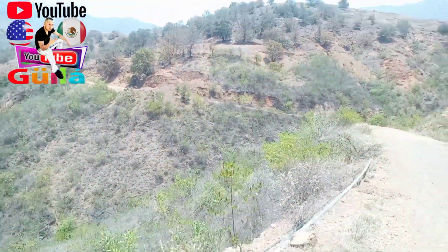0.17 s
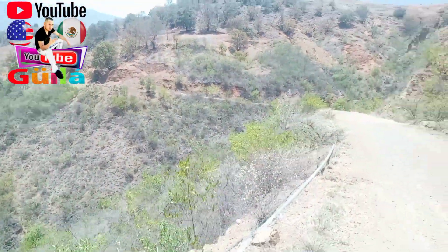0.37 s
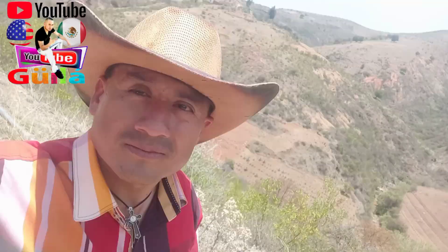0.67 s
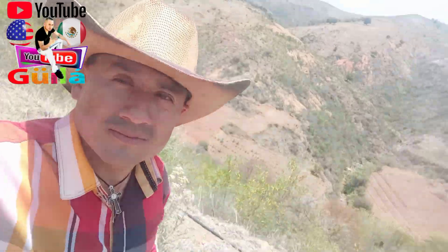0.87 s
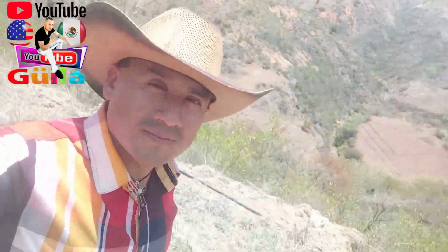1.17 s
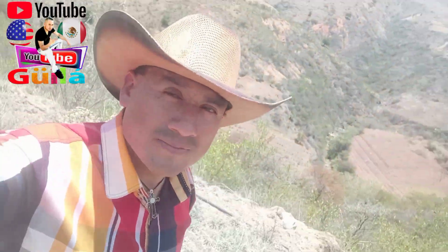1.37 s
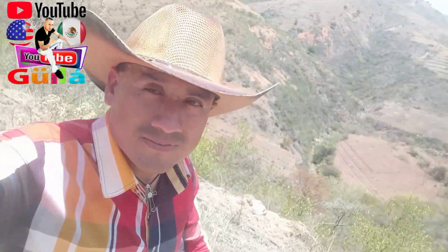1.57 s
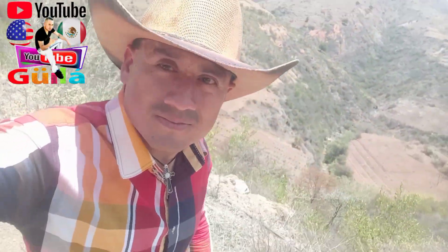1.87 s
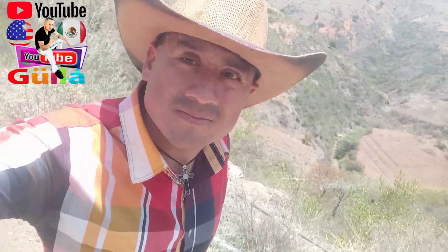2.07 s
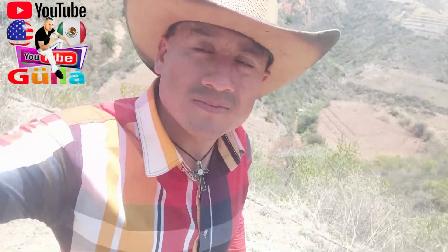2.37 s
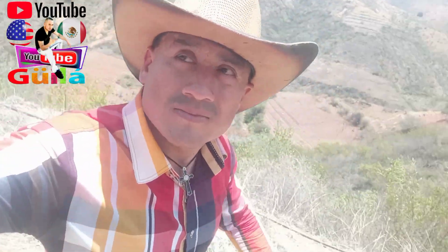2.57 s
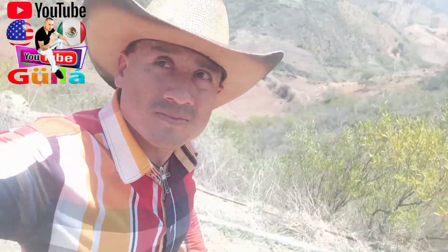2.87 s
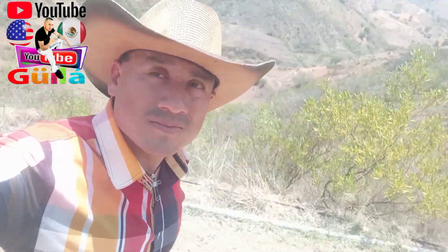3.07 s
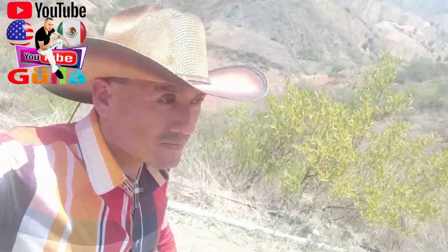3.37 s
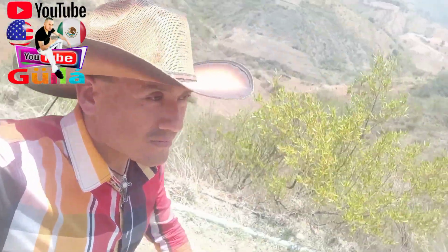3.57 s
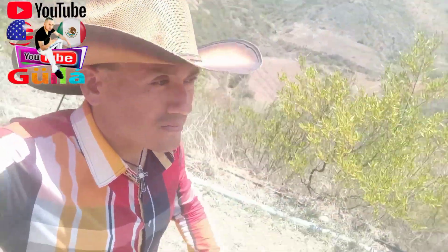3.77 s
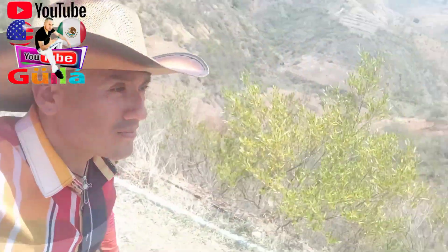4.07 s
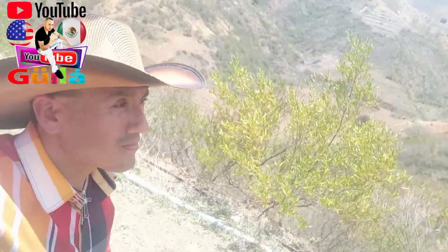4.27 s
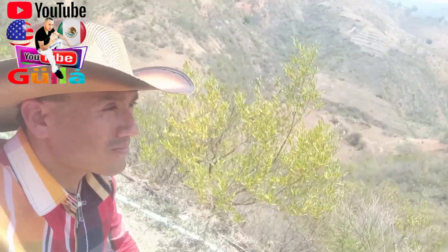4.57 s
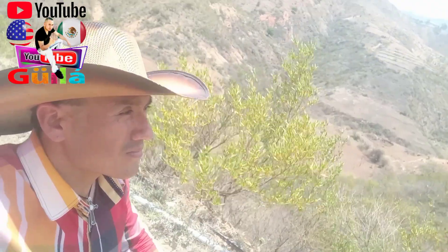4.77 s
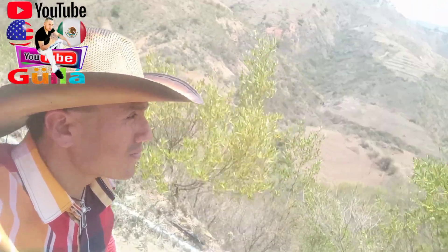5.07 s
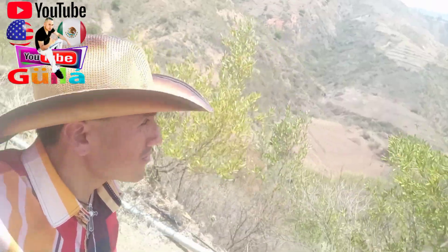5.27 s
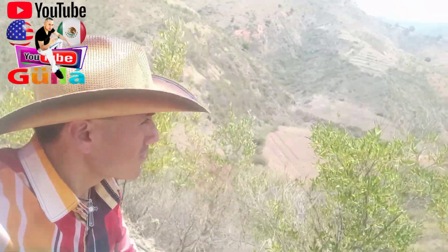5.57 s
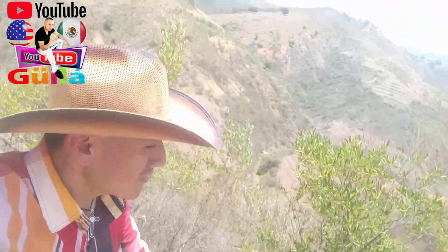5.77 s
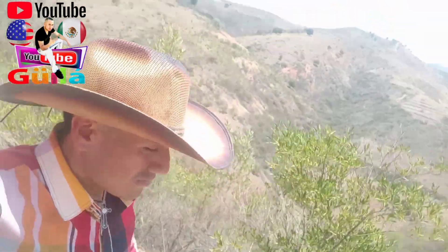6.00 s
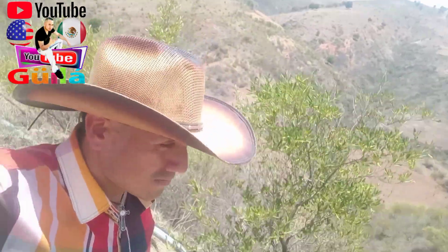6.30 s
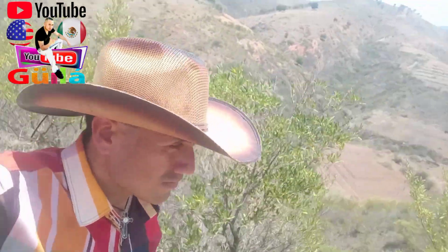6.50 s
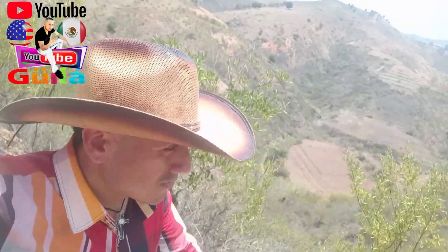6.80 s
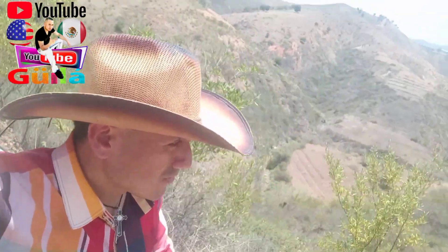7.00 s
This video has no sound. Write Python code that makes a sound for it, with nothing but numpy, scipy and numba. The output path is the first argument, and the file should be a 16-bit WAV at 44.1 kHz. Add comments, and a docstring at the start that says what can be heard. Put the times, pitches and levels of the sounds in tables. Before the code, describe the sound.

Boots crunch over gravel on an open hillside, a sharp knock and brief silence, then wind buffets the handheld microphone ever harder.

```python
"""Gravel crunches and clacks under a walker's feet, a finger knocks the case, and the sound drops out and fades in.
Then wind buffets a small two-port microphone on an open hillside: banded noise throbs and sharp eddies thump.
Stones are dense grains ringing at their own pitch, clacks and grip pops are short swings that fall in pitch,
the knock is bright snaps over a few sagging, decaying tones, and a faint insect on the left is a comb of close lines."""
import sys
import numpy as np
from scipy import signal
from scipy.fft import rfft, irfft, next_fast_len
from scipy.io import wavfile
from scipy.ndimage import uniform_filter1d, minimum_filter1d
from numba import njit

SR = 44100
rng = np.random.default_rng(int(sys.argv[2]) if len(sys.argv) > 2 else 0)


def to_linear_factor(level_db):
    """Convert decibel levels (scalar or array-like) to linear amplitude factors."""
    exponent = np.asarray(level_db, float) / 20
    return 10 ** exponent


def digitize_waveform(pressure):
    """Quantize a signal to 16-bit integers and store it at the path in sys.argv[1].

    Rows of a 2-D input are taken as channels; values are limited to [-1, 1].
    """
    field = np.atleast_2d(pressure).T
    bounded = np.clip(field, -1, 1)
    quanta = np.round(bounded * 32767).astype(np.int16)
    wavfile.write(sys.argv[1], SR, quanta)


N = 314874
T = np.arange(N) / SR  # s
SIZE = next_fast_len(N + 4096)
HZ = np.arange(SIZE // 2 + 1) * SR / SIZE + 1e-3  # kept just above zero
CUT_S, BACK_S, FULL_S = 0.648, 0.677, 0.94  # dropout: cut, fade-in start, full again


def unit(x):
    """Scale to rms 1."""
    return x / np.sqrt(np.mean(x ** 2))


def on_log(hz, table, column=1):
    """Read a spectrum table along a log-frequency axis."""
    table = np.array(table, float)
    return np.interp(np.log(hz), np.log(table[:, 0]), table[:, column])


def shape(x, gain):
    """Filter by a gain for every frequency."""
    return irfft(rfft(x, SIZE) * gain, SIZE)[..., :N]


def walk(rate):
    """Random levels held 1 / rate s and slewed twice; spread 1."""
    hold = int(SR / rate)
    steps = np.repeat(rng.standard_normal(N // hold + 1), hold)
    return unit(uniform_filter1d(uniform_filter1d(steps, hold), hold)[:N])


def ports(pan_db):
    """Left and right gains of a sound whose two halves are unrelated."""
    left = 2 / np.sqrt(1 + to_linear_factor(-2 * pan_db))
    return np.array([left, left * to_linear_factor(-pan_db)])


def thumps(table, rise, fall, glide):
    """Each thump rises within part of a cycle and swings out while its pitch falls."""
    out = np.zeros(N + 1500)
    t = np.arange(-500, 1000) / SR
    for s, db, hz in table:
        cycles = hz * t
        swing = np.cos(2 * np.pi * (cycles - glide * cycles * np.tanh(cycles / 2)))
        swell = np.exp(-(cycles / np.where(t < 0, rise, fall)) ** 2)
        i = int(s * SR) - 500
        out[i:i + len(t)] += to_linear_factor(db) * swing * swell
    return out[:N]


def puffs(table, width_s=0.0051):
    """The air stays rough for a moment around each listed event: bumps of height 1."""
    bumps = [np.exp(-((T[::64] - s) / width_s) ** 2) for s, db, hz in table]
    return np.max(bumps, axis=0).repeat(64)[:N]


# turbulence as the ports hear it: (frequency [Hz], relative level per Hz [dB])
WIND_COLOUR = [(25, -40.5), (35, -25.5), (50, -13), (80, 0.5), (140, 1.5), (220, -3.5), (400, -17.5),
               (700, -35), (1100, -53.5), (1600, -66.5), (2000, -80.5), (2500, -102), (3500, -106)]


def buffet(level_db, bright, stirred_db, rumble_db, throb_db=2.0, flap_db=3.0, knee_hz=148.5,
           rate=300.0, spread_db=1.96, smooth=1.215):
    """Uneven small eddies over smoother flow, in half-octave bands that throb together, upper ones deepest."""
    size = to_linear_factor(spread_db * np.minimum(rng.exponential(size=SIZE), 4))
    knocks = unit((rng.random(SIZE) < rate / SR) * rng.standard_normal(SIZE) * size)
    air = rfft((knocks + smooth * rng.standard_normal(SIZE)) / np.hypot(1, smooth))
    throb = throb_db * walk(15.0) + flap_db * walk(60.0)
    stirred_db = uniform_filter1d(stirred_db - np.mean(stirred_db), size=128)
    colour = to_linear_factor(on_log(HZ, WIND_COLOUR))
    # unit power between 70 and 200 Hz
    core = colour[(HZ > 70) & (HZ < 200)]
    colour = colour / np.sqrt(np.mean(core ** 2) * 130 * 2 / SR)
    out = 0
    for hz in 25 * 2 ** np.arange(0, 7.6, 0.5):
        share = np.cos(np.pi / 2 * np.clip(2 * np.log2(HZ / hz), -1, 1)) ** 2
        octaves = np.log2(hz / knee_hz)
        depth = np.clip(0.17 + 0.57 * octaves, 0, 2.1)
        tilt = np.clip(octaves, 0, 2.9) + 0.25 * np.clip(octaves, -2, 0)
        db = level_db + rumble_db * max(-octaves - 0.5, 0) + bright * tilt
        db = db + depth * (throb + stirred_db) + walk(14.0)
        loss_db = np.log(10) / 20 * depth ** 2 * np.var(throb)  # keeps the mean power as the throb deepens
        out = out + to_linear_factor(db - loss_db) * irfft(air * colour * share, SIZE)[:N]
    return out


# wind strength at the left port, which faces the gusts: (time [s], level [dB])
WIND_LEFT = [(0, -45), (.5, -52.5), (.7, -25.5), (.9, -23), (1, -26.5), (1.08, -26.5), (1.2, -29.5),
             (1.33, -26.5), (1.45, -24.5), (1.64, -35), (1.87, -21), (2.13, -33.5), (2.4, -32.5),
             (2.65, -28), (2.83, -31.5), (3.03, -31), (3.17, -22.5), (3.26, -20.5), (3.35, -16.5),
             (3.5, -22.5), (3.68, -21), (3.85, -26), (4.03, -22.5), (4.24, -27), (4.48, -21.5), (4.65, -24),
             (4.78, -19), (5.05, -22.5), (5.22, -22), (5.5, -21.5), (5.83, -25.5), (6.12, -21.5),
             (6.25, -22.5), (6.31, -16), (6.39, -14.5), (6.52, -16.5), (6.59, -17.5), (6.7, -20.5),
             (6.78, -17), (6.88, -18), (6.94, -17.5), (7.14, -18)]
# wind strength at the sheltered right port: (time [s], level [dB])
WIND_RIGHT = [(0, -43), (.3, -51.5), (.47, -36.5), (.65, -45.5), (1.3, -45), (2.2, -37), (2.45, -41.5),
              (2.65, -36.5), (2.85, -39), (3.25, -29.5), (3.85, -32), (4.3, -34.5), (4.7, -34.5),
              (5.25, -37.5), (5.75, -36), (6.15, -51), (6.4, -43), (6.55, -56), (6.85, -39), (7.14, -46)]
# stronger wind is brighter; left row, right row: (level of neutral colour [dB],
# tilt gained per dB of wind [dB per octave], extra rumble [dB per octave])
BRIGHTENING = [(-25, 0.93, 1), (-35.5, 2.5, 3.5)]
BRIGHTEST_DB = 10.5  # per octave


def wind(port, stirred_db):
    """Buffeting at one port, its brightness set by its strength."""
    level_db = np.interp(T, *np.transpose([WIND_LEFT, WIND_RIGHT][port]))
    neutral_db, slope, rumble_db = BRIGHTENING[port]
    bright = np.minimum(slope * (level_db - neutral_db), BRIGHTEST_DB)
    return buffet(level_db, bright, stirred_db, rumble_db)


# single strong eddies hitting the left port: (time [s], peak level [dB], pitch [Hz])
EDDIES = [(0.8133, -16, 272), (0.898, -14, 250), (0.9233, -14, 250), (1.0093, -13, 242), (1.086, -14, 210),
          (1.3973, -11.5, 271), (1.4363, -18, 279), (1.489, -9.5, 203), (1.78, -19.5, 340),
          (1.82, -11.5, 205), (1.8921, -7.5, 218), (1.9363, -15.5, 253), (2.2228, -18.5, 178),
          (2.9083, -12, 203), (3.1771, -8, 260), (3.2503, -12, 280), (3.3081, -3.5, 326), (3.33, -11, 330),
          (3.3417, -2.5, 387), (3.3825, -4, 280), (3.6362, -8.5, 278), (3.748, -9, 316),
          (4.0069, -9.5, 274), (4.039, -15, 263), (4.4656, -5, 170), (4.566, -13.5, 302),
          (4.6984, -8.5, 253), (4.7333, -24, 228), (4.7795, -7.5, 300), (4.855, -14, 301),
          (5.0483, -7, 328), (5.1214, -25, 235), (5.2328, -12, 269), (5.4627, -9, 237), (5.539, -10.5, 252),
          (5.6132, -11.5, 229), (6.1143, -3.5, 239), (6.1876, -19.5, 238), (6.289, 0.5, 230),
          (6.353, -9, 290), (6.388, -5, 380), (6.4035, -4.5, 350), (6.453, -7.5, 363), (6.4926, -6.5, 372),
          (6.5144, -5, 280), (6.557, 0, 237), (6.6148, -8.5, 320), (6.6273, -20.5, 380),
          (6.662, -10.5, 329), (6.698, -7, 355), (6.7327, 1, 356), (6.84, -5, 332), (6.8678, -3, 430),
          (6.8844, -5, 343), (6.9207, -5, 249), (6.9624, -5, 350), (7.0, -6, 394), (7.041, -7.5, 350),
          (7.0735, -6, 390), (7.0813, -8.5, 420), (7.1172, -3.5, 342)]


def eddies():
    """A strong eddy pushes the left port once and swings out at a falling pitch."""
    return thumps(EDDIES, rise=0.38, fall=0.91, glide=0.45)


# feet on the gravel: (time [s], relative landing level [dB], relative rolling level [dB], rolling length [s])
STEPS = [(.005, -61.5, -56, 0.055), (0.073, -69, -57, 0.057), (0.196, -73.5, -62, 0.075),
         (0.313, -88, -73.5, 0.061), (0.379, -76.5, -74, 0.089), (0.482, -66.5, -57.5, 0.029),
         (0.517, -56, -53, 0.19), (1.111, -59.5, -61.5, .14), (1.652, -49.5, -61.5, 0.1),
         (2.179, -49.5, -59, 0.14), (2.45, -70.5, -81.5, 0.03), (2.522, -79, -82, 0.034),
         (2.705, -48.5, -60.5, 0.16), (3.09, -71, -64.5, 0.045), (3.202, -46.5, -60.5, 0.11),
         (3.732, -52.5, -57, 0.1), (4.232, -50, -59, .1), (4.729, -72.5, -68, 0.03),
         (4.776, -63, -66.5, .06), (5.156, -49.5, -78, .04), (5.233, -71, -65, 0.083),
         (5.329, -61.5, -66, 0.035), (5.793, -46.5, -60.5, 0.055), (5.88, -55, -73, 0.021),
         (6.291, -50, -63.5, 0.1), (6.813, -61, -77.5, 0.022), (6.835, -65.5, -68.5, 0.031)]
LAND_RISE_S, LAND_FALL_S = 0.004, 0.006  # time constants of the landing
SOLE_AFTER_S, SOLE_DB = 0.017, -19  # the sole slaps down just after the heel, relative to it
ROLL_FADE_DB_PER_S = 61.5  # the crunch thins as the foot rolls
LIFT_S = 0.026  # time constant with which it dies as the foot lifts


def tread():
    """Weight on the stones: the heel lands, the sole follows, then a fading roll until the foot lifts."""
    out = np.zeros(N)
    for s, land_db, roll_db, length in STEPS:
        t = T - s
        after = np.maximum(t, 0)
        rise = np.exp(np.minimum(t, 0) / LAND_RISE_S)
        sole = to_linear_factor(SOLE_DB) * np.exp(-np.abs(t - SOLE_AFTER_S) / LAND_RISE_S)
        land = to_linear_factor(land_db) * (np.exp(-after / LAND_FALL_S) + sole)
        lift = np.exp(-np.maximum(t - length, 0) / LIFT_S)
        roll = to_linear_factor(roll_db - ROLL_FADE_DB_PER_S * after) * lift
        out += rise * (land + roll)
    return out


@njit
def grains(start, hz, size, turn, cycles, count):
    """Each stone swells and rings a few cycles at its pitch; small ones are lifted so all pitches weigh alike."""
    out = np.zeros(count + 4000)
    for k in range(len(start)):
        if size[k] > 1e-6:
            pole = np.exp((2j * np.pi - 1 / cycles) * hz[k] / SR)
            z = size[k] * hz[k] / 3000 * np.exp(2j * np.pi * turn[k])
            for i in range(min(int(8 * cycles * SR / hz[k]), 3900)):
                out[start[k] + i] += z.imag * i * hz[k] / SR / cycles
                z *= pole
    return out[:count]


# short bright snaps: the crack and rattle of the knock on the case (0.4556 to 0.4865 s), a wind click
# at the left port (6.731 s), otherwise single stones:
# (time [s], relative level [dB], relative treble level [dB], left minus right before colouring [dB])
SNAPS = [(0.4556, -28, -11, 8), (0.459, -32.5, 1.5, -10), (0.4745, -32, -9, -18), (0.4865, -41, -6, -9),
         (1.6603, -31, -3, -12), (2.1322, -44.5, -15, 7.5), (3.2024, -44, -15.5, 14.5),
         (4.0896, -54, -8.5, -6), (4.974, -50, -10.5, -7.5), (5.159, -46, -13, 9), (6.538, -66, 5.5, 6.5),
         (6.731, -42.5, -28, 46)]
# gravel through the hand and case at each port: (frequency [Hz], relative left gain [dB], relative right gain [dB])
GRAVEL_COLOUR = [(150, -13, -7), (350, 1.5, 12), (870, 4.5, 7), (1230, 4.5, -2), (2100, 1.5, -6.5),
                 (2530, -5, -12), (3700, -21.5, -20.5), (4500, -13, -28), (5600, -10, -29),
                 (6440, -19, -29.5), (7450, -32.5, -33), (10700, -20, -37.5), (12400, -27, -34),
                 (14000, -25, -31.5), (16000, -37, -36.5)]
# before the dropout the microphone faces the ground differently, so the gravel is coloured differently:
# (frequency [Hz], gain [dB])
TURNED = [(700, 1.5), (1300, -0.5), (2500, 3), (3600, 8), (5000, -4.5), (7500, 0), (11000, -1)]
STONE_CYCLES = 2.3  # ring time constant
DULLING_DB_PER_S = 29.5  # per octave above 2.5 kHz: the small stones settle first under a foot


def gravel(rate=9000.0, spread_db=2.5, grind=0.17, clump_db=3.0, lag_s=0.0015, port_gain_db=9.0,
           case_loss_db=12.0):
    """Dense stone grains of uneven size over a grinding hiss, in clumps; short bright snaps on top."""
    weight = tread() * to_linear_factor(clump_db * walk(70.0))
    chance = rng.random((int(rate * N / SR), 3))
    start = (chance[:, 0] * (N - 200)).astype(np.int64)
    hz = 250 * 64 ** chance[:, 1]
    size = to_linear_factor(spread_db * np.minimum(-np.log(1 - chance[:, 2]), 4))
    size = size / np.sqrt(np.mean(size ** 2) * rate / SR)  # rms near 1
    landed = np.array([row[0] for row in STEPS])
    latest = np.maximum(np.searchsorted(landed, start / SR) - 1, 0)
    age = np.maximum(start / SR - landed[latest], 0)
    size = size * to_linear_factor(-DULLING_DB_PER_S * age * np.maximum(np.log2(hz / 2500), 0))
    top = 1 / (1 + (7200 / HZ) ** 16)
    out = np.empty((2, N))
    for port in range(2):
        # paths differ, so each stone reaches the two ports with its own lag and phase
        path = rng.random((len(start), 2))
        lag = (path[:, 0] * lag_s * SR).astype(np.int64)
        crunch = grains(start + lag, hz, size * weight[start], path[:, 1], STONE_CYCLES, N)
        crunch = crunch + grind * weight * rng.standard_normal(N)
        low, high = crunch.copy(), crunch.copy()
        for s, db, top_db, pan_db in SNAPS:
            burst = rng.standard_normal(160) * np.exp(-np.arange(160) / 47.0)
            snap = to_linear_factor(db) * ports(pan_db)[port] * burst
            snap = np.diff(snap, prepend=0) * np.e  # a snap is brighter than the crunch
            i = int((s + 0.001) * SR)
            low[i:i + len(snap)] += snap
            high[i:i + len(snap)] += to_linear_factor(top_db + case_loss_db) * snap
        colour = to_linear_factor(on_log(HZ, GRAVEL_COLOUR, column=1 + port) + port_gain_db)
        out[port] = shape(low, colour * (1 - top)) + shape(high, colour * top)
    return np.where(T < BACK_S, shape(out, to_linear_factor(on_log(HZ, TURNED))), out)


# short pitched clacks: mostly pebbles, also high ticks of the knocked case (0.4586 to 0.4885 s)
# and a wind click (6.732 s):
# (time [s], peak level at the left port [dB], pitch [Hz], left minus right [dB])
CLACKS = [(0.0307, -32.5, 1730, 7), (0.0742, -27, 1460, 16), (0.157, -32.5, 1150, 11),
          (0.4586, -19.5, 5430, 13.5), (0.4756, -50, 5460, -23), (0.4885, -39, 5000, -5),
          (0.521, -28.5, 2000, 5), (0.548, -28, 1390, 8), (1.121, -39.5, 2220, 11.5),
          (1.176, -37.5, 1520, 9), (1.237, -43, 1200, 8), (1.5311, -40.5, 1420, 15), (1.661, -35, 2010, 13),
          (1.717, -52, 1700, 6), (2.186, -34, 2100, 7), (2.3063, -45, 1500, 8), (2.3227, -46, 1900, 9),
          (2.4514, -41.5, 1730, 21), (2.521, -57, 2300, 13), (2.702, -30.5, 2170, 11),
          (3.8755, -53, 1780, 10), (4.225, -45, 5130, 15), (4.78, -41, 4600, 21), (4.822, -50, 3600, 10),
          (5.334, -33.5, 1580, 20), (5.3573, -43.5, 2060, 6), (5.8, -37, 1580, 10),
          (5.8767, -30.5, 3170, 10), (5.884, -41, 3500, -2), (5.888, -32, 3940, 12), (6.295, -37, 2080, 7),
          (6.732, -30, 2600, 44.5), (6.8127, -56, 2290, 5)]


def clacks():
    """Short hard contacts, mostly of pebbles, each ring briefly at their own pitch and port balance."""
    left = [row[:3] for row in CLACKS]
    right = [(s, db - pan_db, hz) for s, db, hz, pan_db in CLACKS]
    return np.array([thumps(table, rise=0.6, fall=2.2, glide=0.08) for table in (left, right)])


# pops of the shifting grip near the right port: (time [s], peak level [dB], pitch [Hz])
GRIP = [(0.2012, -25, 443), (1.0178, -20.5, 517), (1.052, -28, 422), (1.1386, -20, 494),
        (1.157, -21.5, 445), (1.172, -28, 500.0), (1.2361, -18, 550), (1.3793, -36.5, 350),
        (2.0802, -27.5, 350), (2.2063, -27, 455), (2.3236, -43, 340), (2.4956, -32.5, 460),
        (2.5306, -37, 425), (3.2636, -16, 423.0), (3.4228, -14.5, 458), (3.6536, -31, 372),
        (4.0743, -16.5, 416), (4.9766, -22, 438), (5.7873, -27, 428), (6.3353, -23.5, 597)]


def grip():
    """The shifting hand pops: short swings whose pitch falls steeply."""
    return thumps(GRIP, rise=0.36, fall=0.8, glide=0.8)


# ringing of the tapped case: (start pitch [Hz], relative level [dB], time to fall 60 dB [s],
# time in which the pitch halves [s])
CASE = [(1050, -2.5, 0.014, 0.00139), (340, -14.5, 0.063, 0.0032), (3370, -6, 0.0021, 0.044)]
KNOCK_S = 0.4575


def knock(left_db=-9.5, right_db=6.5):
    """A finger tap rings the case, mostly near the right port; the pitch sags as the finger stays on."""
    t = np.maximum(T - KNOCK_S, 0)
    ring = 0
    for hz, db, t60, sag in CASE:
        tone = np.sin(2 * np.pi * hz * sag * np.log(1 + t / sag))
        ring = ring + to_linear_factor(db) * tone * np.exp(-np.log(1000) * t / t60)
    ring = ring * t / (t + 0.00012)  # soft onset
    # the far port gets it reversed, hollow in the low middle
    thin = shape(ring, np.hypot(HZ / np.hypot(HZ, 1200.0), 1 / (1 + (HZ / 370.0) ** 4)))
    return np.array([-to_linear_factor(left_db) * thin, to_linear_factor(right_db) * ring])


# insect song: (time [s], relative level [dB])
INSECT = [(.72, -100), (.85, -73.5), (.98, -77), (1.05, -86), (1.18, -82), (1.3, -80.5), (1.36, -92),
          (1.42, -81.5), (1.55, -79), (1.63, -83.5), (1.72, -93), (1.85, -92), (2.05, -84), (2.3, -106),
          (2.8, -96), (3.2, -110)]
# resonances of the insect's body: (frequency [Hz], width [Hz], relative level [dB])
INSECT_BODY = [(6750, 420, -7), (8330, 260, 2.5), (9100, 700, -1)]
INSECT_RATE_HZ = 361.4  # mean click rate


def insect(right_db=-20.5):
    """Steady clicks ring the insect's body, so the song is a comb of close lines."""
    # the pitch wavers and trembles by about a thousandth
    waver = 1 + walk(3.0) / 1000 + walk(40.0) / 700.0
    phase = np.cumsum(INSECT_RATE_HZ * waver) / SR
    chirp_db = 6.0 * np.minimum(walk(30.0), 0.6)  # the song breaks into chirps
    song = 0
    for k in range(16, 30):
        line_hz = k * INSECT_RATE_HZ
        body = sum(to_linear_factor(db) / np.hypot(1, 2 * (line_hz - hz) / width) ** 2 for hz, width, db in INSECT_BODY)
        song = song + body * to_linear_factor(chirp_db + 3.0 * walk(13.0)) * np.sin(2 * np.pi * k * phase)
    s, db = np.transpose(INSECT)
    level = to_linear_factor(np.interp(T, s, db, left=-140, right=-140))
    return level * song * np.array([[1], [to_linear_factor(right_db)]])


def scene():
    """Wind, eddies, grip, steps, clacks, knock and insect at the two ports."""
    left = wind(port=0, stirred_db=6.9 * puffs(EDDIES)) + eddies()
    right = wind(port=1, stirred_db=2.3 * puffs(GRIP)) + grip()
    return np.array([left, right]) + gravel() + clacks() + knock() + insect()


# colour of the preamp hiss: (frequency [Hz], relative level per Hz [dB])
HISS = [(300, 8), (1500, 10.5), (3000, 4.5), (8000, 1.5), (16000, 4.5)]


def preamp_hiss(level_db=-73.5):
    """Steady coloured noise of the preamp, unrelated in the two channels."""
    return to_linear_factor(level_db) * unit(shape(rng.standard_normal((2, N)), to_linear_factor(on_log(HZ, HISS))))


def limiter(x):
    """A peak limiter that looks a few ms ahead and turns the gain down smoothly."""
    room = minimum_filter1d(np.minimum(1, 0.96 / (np.abs(x) + 1e-9)), size=500)
    return x * uniform_filter1d(uniform_filter1d(room, size=250), size=250)


def dropout(x, fade_step_s=0.0101):
    """The sound is cut, then fades in by a gain that climbs in small steps."""
    held = BACK_S + (T - BACK_S) // fade_step_s * fade_step_s
    fall = np.clip((CUT_S - T) / 0.0011, 0, 1)
    climb = np.clip((held - BACK_S) / (FULL_S - BACK_S), 0, 1)
    return np.where(T < BACK_S, fall, climb) * x


def low_pass(x):
    """Removes everything above the highest recorded frequency."""
    return signal.sosfilt(signal.butter(12, 16360, fs=SR, output="sos"), x)


def record(dry):
    """Preamp hiss, bass and top cut, a peak limiter, then the dropout."""
    x = shape(dry + preamp_hiss(), (HZ < 15800) / np.hypot(1, (38 / HZ) ** 3))
    mix = dropout(limiter(x))
    return low_pass(mix)


dry = scene()
out = record(dry)
digitize_waveform(out)
```